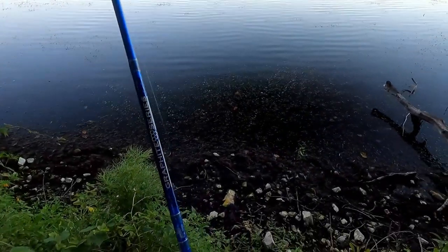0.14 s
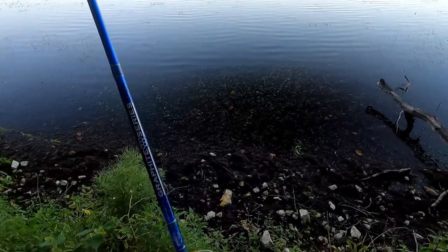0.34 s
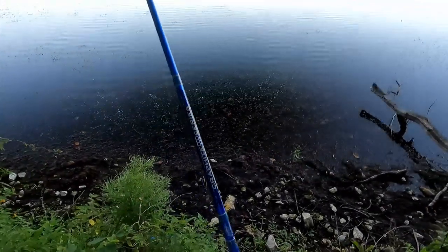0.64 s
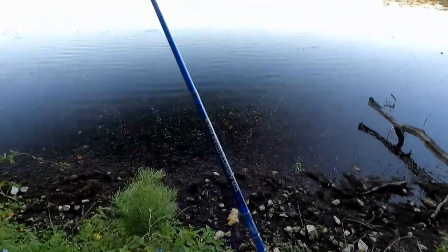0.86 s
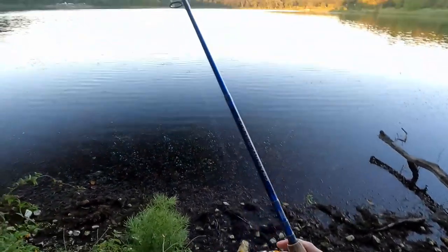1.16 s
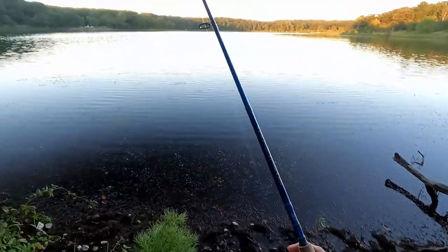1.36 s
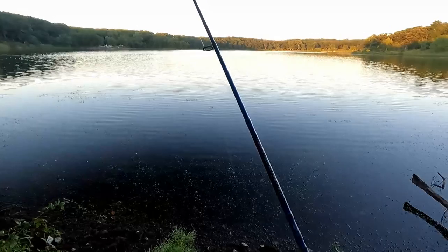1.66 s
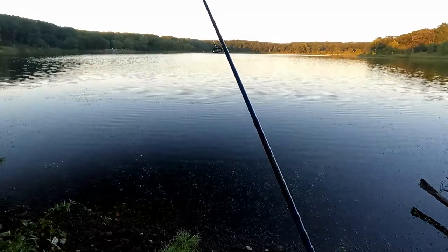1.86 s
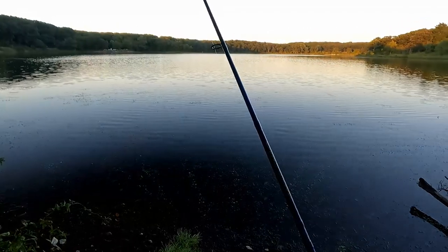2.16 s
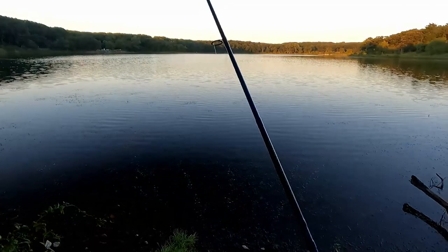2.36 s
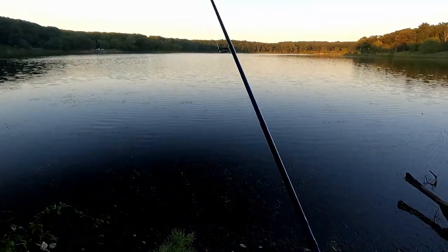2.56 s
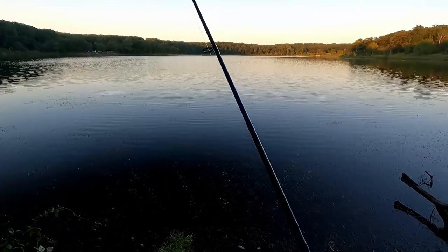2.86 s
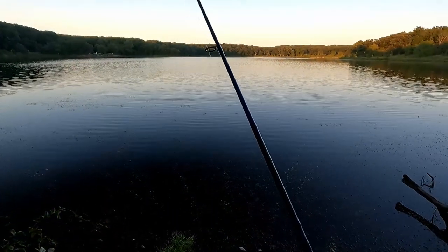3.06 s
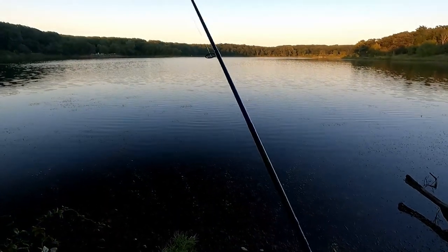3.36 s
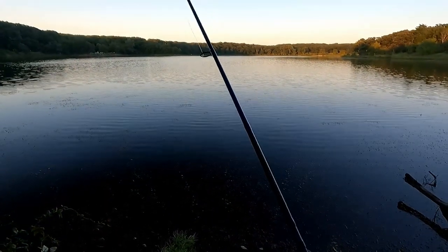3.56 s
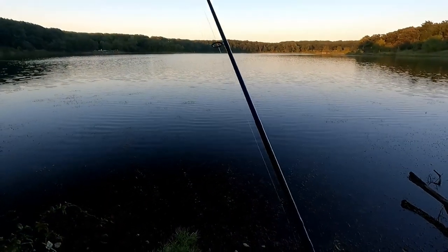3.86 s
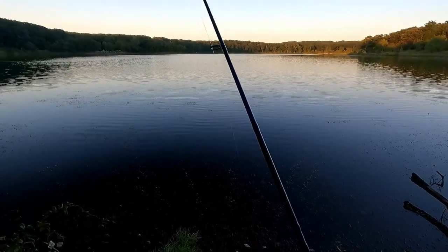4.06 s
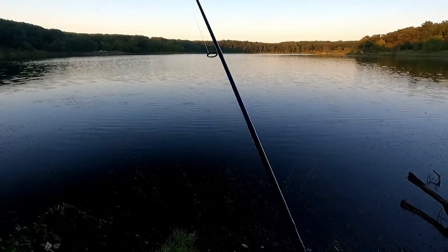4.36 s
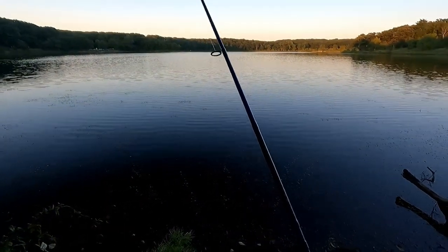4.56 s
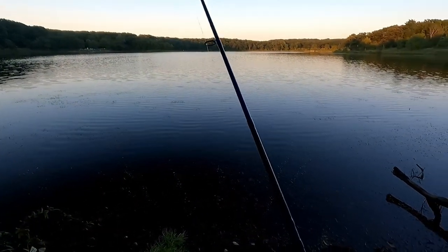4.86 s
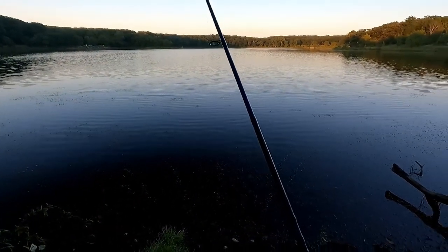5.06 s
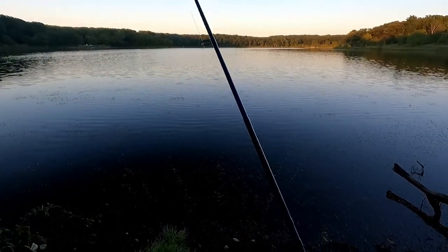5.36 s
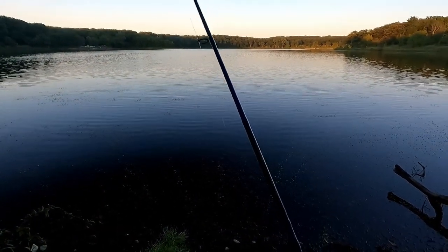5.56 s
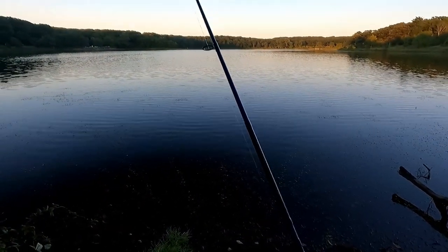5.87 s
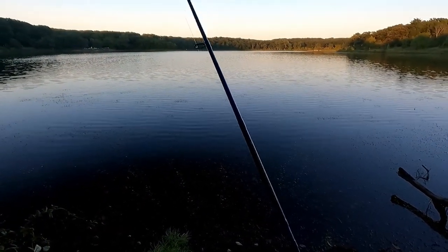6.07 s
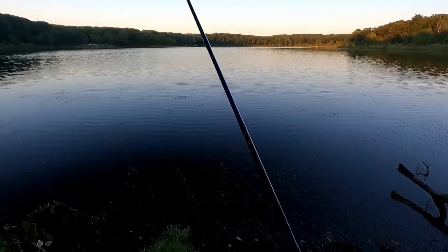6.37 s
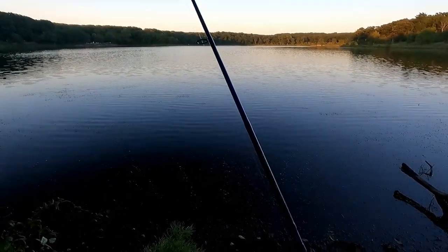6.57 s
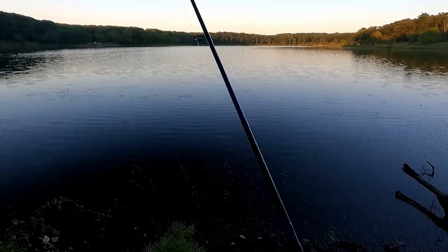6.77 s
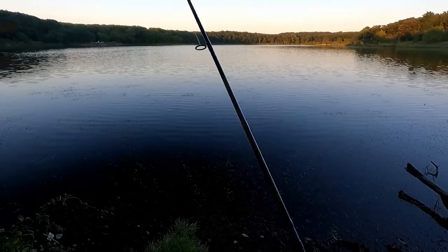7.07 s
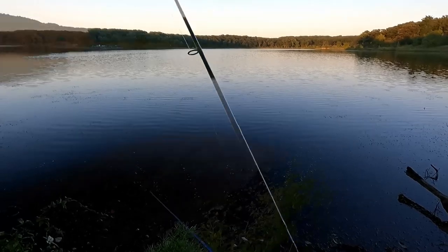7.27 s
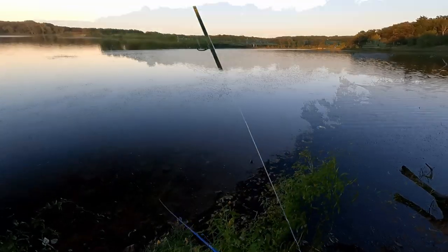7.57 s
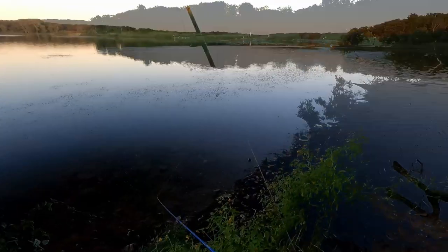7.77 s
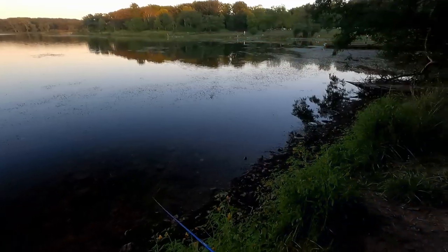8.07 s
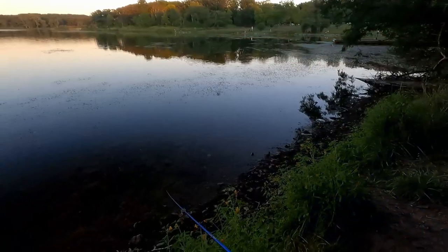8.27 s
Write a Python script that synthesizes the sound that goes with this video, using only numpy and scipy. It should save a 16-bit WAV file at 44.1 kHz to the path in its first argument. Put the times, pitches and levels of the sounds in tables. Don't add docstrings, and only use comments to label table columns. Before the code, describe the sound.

A quiet lakeshore in open air, wide stereo, with low wind rumble, wavering far engines and soft road hiss throughout. From 0 s two near tree crickets trill at about 7.5 kHz, fast and fluttering, drifting against each other, left of centre; one grows clearer by 1 s. A ground cricket chirps briefly every half second or so. On the left a katydid ticks three times and buzzes dryly from 0.3 to 1.5 s, again from 2.5 to 3.9 s, and from 6.2 to 7.5 s. Hard plastic reel clicks fall at 0.2-0.35 s, smaller ones around 0.9-1.2 s, with line brushing the rod and flicking at 1.2 s. A far water bird honks at 1.6-1.9 s and coos at 2.2 and 3.2-3.5 s. A distant car swells slightly near 3.6 s. At 7.57 s the sound cuts abruptly: near insects vanish, leaving distant hum, a faint cricket until 8.3 s, deeper rumble and small clicks.

```python
import sys
import numpy as np
from scipy import signal
from scipy.fft import rfft, irfft, next_fast_len
from scipy.io import wavfile
from scipy.ndimage import uniform_filter1d, map_coordinates

SR = 44100
rng = np.random.default_rng(int(sys.argv[2]) if len(sys.argv) > 2 else 0)


def ratio_of_db(decibels):
    return 10 ** (np.asarray(decibels, float) / 20)


def store_pcm(level_fs):
    pcm = np.round(np.clip(level_fs, -1, 1) * 32767).astype(np.int16)
    wavfile.write(sys.argv[1], SR, np.atleast_2d(pcm).T)


N = 371322
TIME = np.arange(N) / SR
CHANGE_S = 7.573


def unit(x):
    return x / np.sqrt(np.mean(x ** 2) + 1e-20)


def along(points, hz):
    f, *columns = np.transpose(points)
    return [np.interp(np.log(hz + 1), np.log(f + 1), column) for column in columns]


def wobble(rate):
    knots = rng.standard_normal(int(N * rate / SR) + 4)
    return map_coordinates(knots, [TIME * rate])


def filtered(x, response):
    m = next_fast_len(N + 8192)
    return irfft(rfft(x, m) * response(np.fft.rfftfreq(m, 1 / SR)), m)[..., :N]


def colour(points):
    return lambda hz: ratio_of_db(along(points, hz)[0])


def resonances(modes):
    def response(f):
        power = 0
        for centre, width, db in modes:
            spread = (f * width) ** 2
            power = power + ratio_of_db(2 * db) * spread ** 2 / ((centre ** 2 - f * f) ** 2 + spread) ** 2
        return np.sqrt(power)
    return response


# [pitch_hz, left_right_likeness (0 to 1), left_over_right_db]
WIDTH = [
    [(25, .99, 0), (60, .999, 0), (150, .997, .1), (290, .98, .2), (640, .8, 1), (1300, .8, .2),
     (2400, .7, -3), (4000, .4, -1.5), (5600, .3, -2), (7500, .3, 3), (12000, .3, 9)],
    [(60, .999, 0), (150, .995, .5), (290, .94, 1.5), (640, .3, 4), (1300, .4, 4.5), (2400, .7, 0),
     (4000, .5, 0), (5600, .3, -1), (7500, .3, 0), (12000, .3, 8)],
]


def rush(response, view):
    def ears(hz):
        alike, lean_db = along(WIDTH[view], hz)
        turn = np.arccos(np.clip(alike, -1, 1)) / 2
        shared, differing = np.cos(turn), np.sin(turn)
        mix = np.array([[shared, differing], [shared, -differing]])
        return response(hz) * mix * ratio_of_db([[lean_db / 2], [-lean_db / 2]])
    pair = filtered(rng.standard_normal((2, N)), ears).sum(axis=1)
    return pair / np.std(pair.mean(axis=0))


def placed(x, lean_db, lag):
    left, right = ratio_of_db(lean_db / 2), ratio_of_db(-lean_db / 2)
    late = filtered(x, lambda hz: np.exp(-2j * np.pi * hz * lag / SR))
    return np.array([left * x, right * late]) * 2 / (left + right)


def bushes(x, t60):
    t = np.arange(SR // 3) / SR
    tail = rng.standard_normal((2, len(t))) * ratio_of_db(-60 * t / t60) * (t > .003)
    return signal.fftconvolve(x[None], tail / np.linalg.norm(tail[0]), axes=1)[:, :N]


# [pitch_hz, level_db per Hz]
RUMBLE_COLOUR = [
    [(7.1, -48), (12, -15), (47, 1), (65, 2), (112, -1), (188, -9), (218, -12), (242, -15.5), (273, -12.5),
     (351, -25), (420, -25.5), (550, -52.5), (920, -120)],
    [(7.1, -53), (12, -31), (81, -2), (191, -18.5), (218, -24.5), (232, -27.5), (336, -33.5), (384, -36),
     (420, -46), (550, -60), (920, -120)],
]
# [pitch_hz, level_db per Hz]
HISS_COLOUR = [
    [(190, -25), (330, -0.5), (349, -2.5), (548, -3.5), (738, -7), (824, -11.5), (1120, -4), (1310, -7),
     (1820, -15), (2220, -19), (2480, -14.5), (3270, -39.5), (4600, -31), (5980, -56), (10100, -120)],
    [(190, -47), (330, -20), (389, 2), (502, -6), (930, -6), (1100, -6), (1560, -11), (2130, -18.5),
     (2560, -6.5), (2990, -25), (4600, -30.5), (5980, -59), (10100, -120)],
]
# [pitch_hz, width_hz, level_db]
LOW_HUM = [
    [(2450, 97, -2), (2584, 330, -4.5), (2860, 870, -18.5)],
    [(2450, 180, -4), (2620, 210, -2), (2900, 390, -13)],
]
# [pitch_hz, width_hz, level_db]
HIGH_HUM = [
    [(5360, 660, -6.5), (5670, 470, -1), (6680, 440, -8), (7500, 410, 1.5)],
    [(5270, 740, -4), (5650, 580, -1.5), (6700, 1200, -8.5), (7570, 540, 1.5)],
]
# [pitch_hz, level_db per Hz]
FAR_KATYDIDS = [
    [(8000, -31), (8800, -23), (10200, -23.5), (10700, -10.5), (11400, -6.5), (12000, 4.5), (12600, -6),
     (13800, -12), (14600, -9), (15200, -11.5), (15700, -14)],
    [(7800, -40), (8400, -2), (10000, -8), (11200, -6), (12000, 2), (13000, -7), (14000, -16), (15700, -23)],
]


def air(view):
    rumble_db = (-38, -33.5)[view]
    levels_db = [[-54.5, -56], [-68.5, -66.5], [-61, -65], [-74.5, -77.5]]
    hush_s, hush_db_per_s = 8.07, (-3.5, -10, -5, -20)
    hush_db = np.outer(hush_db_per_s, np.maximum(TIME - hush_s, 0))
    hiss_db, low_db, high_db, far_db = hush_db + [[db[view]] for db in levels_db]

    rumble_db = rumble_db + 0.45 * wobble(1.506) + 0.44 * wobble(6)
    rumble = ratio_of_db(rumble_db) * rush(colour(RUMBLE_COLOUR[view]), view)

    car_s, car_length_s, car_db = 3.6, 0.8, 1.5
    pass_db = car_db * np.exp(-((TIME - car_s) / car_length_s) ** 2)
    hiss = ratio_of_db(hiss_db + pass_db + 0.63 * wobble(9)) * rush(colour(HISS_COLOUR[view]), view)

    drift_db = wobble(1.5) - .25 * (TIME - 4) * (view == 0)
    low_db = low_db + drift_db + 0.67 * wobble(14) + 1.5 * wobble(60)
    low = ratio_of_db(low_db) * rush(resonances(LOW_HUM[view]), view)

    high_db = high_db + 0.86 * wobble(0.83) + 0.46 * wobble(10) + 0.71 * wobble(70)
    high = ratio_of_db(high_db) * rush(resonances(HIGH_HUM[view]), view)
    high = filtered(high, lambda hz: hz < 8300)

    beat_db = 2.2 * np.sin(2 * np.pi * np.cumsum(36.5 + wobble(1.89)) / SR)
    beat_db = beat_db + 1.5 * np.sin(2 * np.pi * 21.4 * TIME)
    far = ratio_of_db(far_db + 1.5 * wobble(1.6) + beat_db) * rush(colour(FAR_KATYDIDS[view]), view)
    return rumble + hiss + low + high + far


def lorry():
    stays_s, fade_db_per_s = 2.45, -5
    level_db = -57.5 + fade_db_per_s * np.maximum(TIME - stays_s, 0)
    return ratio_of_db(level_db) * rush(resonances([(286, 174, 0)]), view=0)


# [pitch_hz, level_db, start_s, end_s]
ENGINE_NOTES = [
    (105, -47.5, 0.5, 3.78),
    (218.9, -55, -1, 7.6),
    (264.6, -60.5, 0.7, 4.16),
    (58.94, -48.5, 5, 9.8),
    (126.4, -49, 7, 6.2),
    (175.8, -56.5, 2.5, 3.98),
    (74.6, -40, 7.5, 8.5),
]


def engines():
    out = np.zeros(N)
    for hz, db, start, end in ENGINE_NOTES:
        on = np.interp(TIME, [start - .3, start, end, end + 0.24], [0, 1, 1, 0])
        pitch = hz * (1 + 0.01203 * wobble(3))
        out += on * ratio_of_db(db + 3 + 3.2 * wobble(4)) * np.sin(2 * np.pi * np.cumsum(pitch) / SR)
    return out


def beaten(at, rate, change, t=TIME):
    return at + rate * t + change * t ** 2 / 2


def cycle(done, jitter):
    whole = np.round(done)
    luck = rng.standard_normal((500, 3))[whole.astype(int) % 500].T
    return done - whole + jitter * luck[0], luck[1], luck[2]


def glide(place, top_hz, top, rise_hz, fall_hz, round_):
    slope = np.where(place < top, rise_hz, fall_hz)
    return top_hz - slope * (np.hypot(place - top, round_) - abs(round_))


def press(place, meet, loudest, part, early_db, late_db):
    edge, silent_db = 0.036, -46
    places = [meet, meet + edge, loudest, part - edge, part]
    return np.interp(place, places, [silent_db, early_db, 0, late_db, silent_db], -90, -90)


def trill(beat, arch, force, jitter, scatter_db, scatter_hz):
    place, size, tune = cycle(beaten(*beat), jitter)
    pitch = glide(place, **arch) + scatter_hz * (tune + wobble(150))
    level = ratio_of_db(press(place, **force) + scatter_db * (size + wobble(200)))
    song = uniform_filter1d(level, size=40) * np.sin(2 * np.pi * np.cumsum(pitch) / SR)
    return unit(filtered(song, lambda hz: 1 / (1 + (hz / 8250) ** 40)))


LOW_BEAT, HIGH_BEAT, LATE_BEAT = (-.456, 34.675, -.0157), (-.267, 35.3595, 0), (-275.05, 36.02, 0)
LOW_GLIDE = dict(top_hz=7446, top=0.0307, rise_hz=4300, fall_hz=4996, round_=.16)
HIGH_GLIDE = dict(top_hz=7763, top=.1, rise_hz=839, fall_hz=4560, round_=.03)
LOW_PRESS = dict(meet=-.34, loudest=-0.23, part=0.37, early_db=-8, late_db=-6.5)
HIGH_PRESS = dict(meet=-0.32, loudest=-.03, part=0.34, early_db=-7.5, late_db=-8)


def tree_crickets():
    low_db, high_db, lean_db = -54.5, -50, 8
    first = trill(LOW_BEAT, LOW_GLIDE, LOW_PRESS, jitter=.012, scatter_db=0.6, scatter_hz=25.0)
    first = first * ratio_of_db(low_db + 0.74 * wobble(2.57))
    shade_db = np.interp(TIME, (0.46, 1.08), [-8, 0])
    second = trill(HIGH_BEAT, HIGH_GLIDE, HIGH_PRESS, jitter=0.01202, scatter_db=0.02, scatter_hz=19.8)
    second = second * ratio_of_db(high_db + shade_db + 0.84 * wobble(2.5))
    near = placed(first, lean_db - .6, lag=1.0) + placed(second, lean_db + .6, lag=0.6)
    return near + ratio_of_db([[-12], [-17]]) * bushes(first + second, t60=0.17)


# [start_s, level_db]
CHIRP_TIMES = [(0.021, -59), (0.559, -61), (1.103, -61), (1.609, -61), (2.148, -59), (2.69, -58),
               (3.239, -60), (3.8, -59), (4.377, -63), (4.995, -60), (5.654, -59), (6.217, -60),
               (6.853, -59), (7.458, -64)]


def ground_cricket():
    pulse_rate = 72.3
    out = np.zeros(N + SR)
    t = np.arange(SR // 8) / SR
    place = t * pulse_rate % 1
    pulse = np.sin(np.pi * np.clip(place / .62, 0, 1)) ** 2
    pitch = np.interp(t, [0, .02, .05, .12], [6090, 6180, 6200, 6150]) - 380 * (place - .3)
    for s, db in CHIRP_TIMES:
        size_db, tune = rng.standard_normal((2, 10))[:, (t * pulse_rate).astype(int)]
        turn = 2 * np.pi * np.cumsum(pitch + 35 * tune) / SR
        level = ratio_of_db(db + 4.5 + 1.6 * size_db)
        out[round((s - .004) * SR):][:len(t)] += level * pulse * np.sin(turn)
    echo = ratio_of_db(-3) * bushes(out[:N], t60=.12)
    return placed(out[:N], -1.5, lag=0.83) + echo


def buzz(start, end, at):
    strokes = beaten(at, 38.45, -.94, TIME - start)
    place, size, _ = cycle(strokes, jitter=0.018)
    rasp_on, rasp_off, rise, fall, rest_db = -0.34, 0.13, 0.1, 0.1, -14
    stroke_db = np.interp(place, [rasp_on - rise, rasp_on, rasp_off, rasp_off + fall],
                          [rest_db, -4, 0, rest_db])
    swell_s, settle_s, last_s, release_s = 0.095, .25, .008, .017
    moments = [start, start + swell_s, start + settle_s, end - last_s, end, end + release_s]
    effort_db = np.interp(TIME, moments, [-12.5, -3, -0.6, 0, 2.5, -12.5], -90, -90)
    return ratio_of_db(-55.5 + effort_db) * unit(ratio_of_db(stroke_db + 0.75 * size))


# [start_s, peak_db]
TICK_TIMES = [
    (0.106, -45.5),
    (0.195, -44),
    (0.2718, -45.5),
    (2.5186, -43.5),
    (2.614, -44),
    (2.696, -45.5),
    (6.1602, -44.5),
    (6.252, -43),
    (6.3315, -43),
]
# [start_s, end_s, place_at_start (cycles)]
BUZZ_TIMES = [
    (.33, 1.462, .222),
    (2.735, 3.935, .586),
    (6.385, 7.56, .49),
]
# [pitch_hz, level_db per Hz]
WING_COLOUR = [(7800, -70), (8700, -23), (9600, -16.5), (10800, -15.5), (11300, -8), (11800, 3),
               (12050, -5), (12300, 6.5), (12700, -8), (13000, -3), (13600, -13), (14200, -17), (14900, -9),
               (15700, -26)]
# [pitch_hz, level_db]
RIGHT_SHADE = [(9000, 4), (11000, -1), (12000, -16), (13000, 3.5), (14500, 1), (15500, -8)]


def katydid():
    level = sum(buzz(*row) for row in BUZZ_TIMES)
    for s, db in TICK_TIMES:
        tick_db = np.interp(TIME - s, [-0.0058, 0.0015, 0.011, 0.014, 0.028, 0.078],
                            [-32, 5.5, -1.5, -11, -20, -33], -140, -140)
        level = level + ratio_of_db(db - 9.5 + tick_db)
    teeth = ratio_of_db(2 * np.sin(2 * np.pi * 355 * TIME))
    rasp = unit(filtered(teeth * rng.standard_normal(N), colour(WING_COLOUR))) * level
    left, right = placed(rasp, 15.5, lag=2.4) + ratio_of_db([[-8], [-7]]) * bushes(rasp, t60=0.14)
    return np.array([left, filtered(right, colour(RIGHT_SHADE))])


def drag():
    start, rise, flick, flick_rise, flick_fall, tail = 0.79, 0.19, 1.185, 0.047, .035, 0.2
    drag_db, flick_db = -63, -52.5
    free = flick + flick_fall
    moments = [start, start + rise, flick - flick_rise, flick, free, free + tail]
    levels_db = [drag_db - 9, drag_db, drag_db, flick_db, drag_db - 3, drag_db - 18]
    return np.interp(TIME, moments, levels_db, -140, -140)


# [start_s, peak_db, ring_hz, fade_s (time to fall 60 dB), snap_strength]
CLICK_TIMES = [(.1998, -44.5, 4930, .008, 0.48), (0.276, -32.5, 2060, 0.013, 1.1),
               (.348, -37, 1930, 0.011, 0.68), (.884, -48.5, 2810, 0.0069, 1.04),
               (0.963, -46, 2700, .006, 1), (1.043, -50, 3000, .005, 1.1), (1.172, -46, 4450, 0.009, 0.46),
               (2.449, -59, 3000, 0.057, .2), (2.515, -58, 3000, 0.039, .2), (7.73, -51, 9000, 0.0034, .8),
               (7.846, -41, 1500, 0.014, .1), (7.936, -50, 10000, .002, 0.81),
               (8.212, -52, 5500, 0.0054, 0.5), (8.27, -55, 11000, .003, .3), (8.334, -53, 9500, .003, .3),
               (8.413, -55, 9500, 0.0034, .3), (4.46, -55, 8750, 0.0044, .3), (4.6, -50, 9100, 0.0045, .4),
               (4.617, -52, 9200, .005, .4), (5.47, -62, 4500, 0.0038, .8), (6.25, -53, 4490, 0.0045, .8)]


def reel():
    rings, snaps = np.zeros(N + SR), np.zeros(N + SR)
    t = np.arange(SR // 10) / SR
    for s, db, hz, t60, snap in CLICK_TIMES:
        i = round(s * SR)
        attack = 1 - np.exp(-t / 0.00044)
        rings[i:][:len(t)] += ratio_of_db(db + 3 - 60 * t / t60) * attack * np.sin(2 * np.pi * hz * t)
        crack = 0.77 * rng.standard_normal(len(t)) + 5 * (t == 0)
        snaps[i:][:len(t)] += ratio_of_db(db - 60 * t / 0.0044) * snap * crack
    body = resonances([(3000, 1650, 7.0), (5160, 3700, 0.5), (10000, 8000, -26)])
    rod = resonances([(4300, 3800, 0.79), (6240, 2730, -0.41)])
    brush = unit(filtered(rng.standard_normal(N), rod))
    hits = rings[:N] + filtered(snaps[:N], body) + ratio_of_db(drag() + 1.9 * wobble(150)) * brush
    echo = ratio_of_db(-13) * bushes(hits, t60=.05)
    return placed(hits, -1, lag=-0.97) + echo


def note(s, length, from_hz, to_hz, db, overtones_db):
    u = np.clip((TIME - s) / length, 0, 1)
    bow = 4 * u * (1 - u)
    pitch = from_hz + (to_hz - from_hz) * u + 55 * bow
    turn = 2 * np.pi * np.cumsum(pitch * (1 + 0.0122 * wobble(60))) / SR
    voice = sum(ratio_of_db(over_db) * np.sin((k + 1) * turn) for k, over_db in enumerate(overtones_db))
    swell_db = -15 * (1 - bow) ** 2
    return (bow > 0) * ratio_of_db(db + 2.0 + swell_db + 3.8 * wobble(40.77)) * voice


# [start_s, length_s, from_hz, to_hz, level_db]
HONK_NOTES = [
    (1.635, .09, 545, 688, -56),
    (1.77, 0.092, 670, 573, -54),
]
# [start_s, length_s, from_hz, to_hz, level_db]
SQUEAK_NOTES = [
    (1.71, 0.052, 556, 555, -58),
]
# [start_s, length_s, from_hz, to_hz, level_db]
COO_NOTES = [
    (2.24, .3, 685, 589, -58.5),
    (3.2, 0.163, 592, 549, -59.5),
    (3.42, .12, 698, 786, -57),
    (7.25, 0.15, 679, 754, -72),
]


def bird():
    kinds = [(HONK_NOTES, [-14, 0, -13, -8]), (SQUEAK_NOTES, [-20, -14, -14, -2]), (COO_NOTES, [0, -18])]
    out = sum(note(*row, overtones_db) for rows, overtones_db in kinds for row in rows)
    return placed(out, -2.7, lag=.1) + ratio_of_db(-7) * bushes(out, t60=.25)


def late_cricket():
    drop_s, release_s = 8.26, 0.083
    level_db = -67 + np.interp(TIME - drop_s, [0, release_s], [0, -12])
    song = trill(LATE_BEAT, HIGH_GLIDE, HIGH_PRESS, jitter=0.015, scatter_db=1.5, scatter_hz=30.3)
    song = ratio_of_db(level_db) * song
    echo = ratio_of_db(-5) * bushes(song, t60=.2)
    return placed(song, 0.11, lag=0.63) + echo


def scene():
    second = np.clip((TIME - CHANGE_S) / 0.0051 + .5, 0, 1)
    before = air(0) + lorry() + tree_crickets() + ground_cricket() + katydid() + bird()
    after = air(1) + late_cricket()
    return (1 - second) * before + second * after + engines() + reel()


def roll_off(x):
    return signal.sosfilt(signal.butter(12, 15760, fs=SR, output="sos"), x)


def record(dry):
    return roll_off(dry)


dry = scene()
out = record(dry)
store_pcm(out)
```